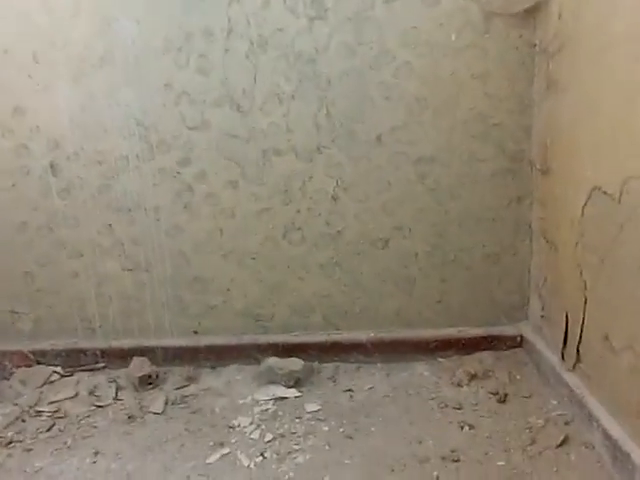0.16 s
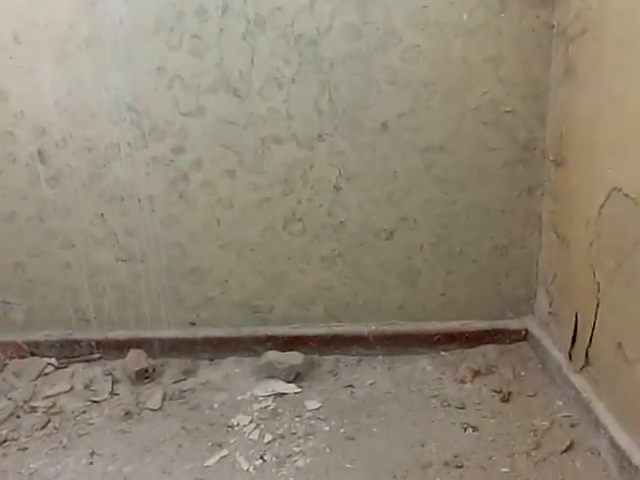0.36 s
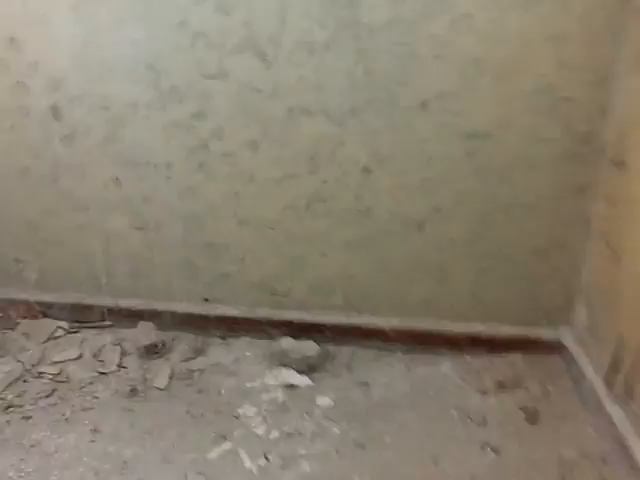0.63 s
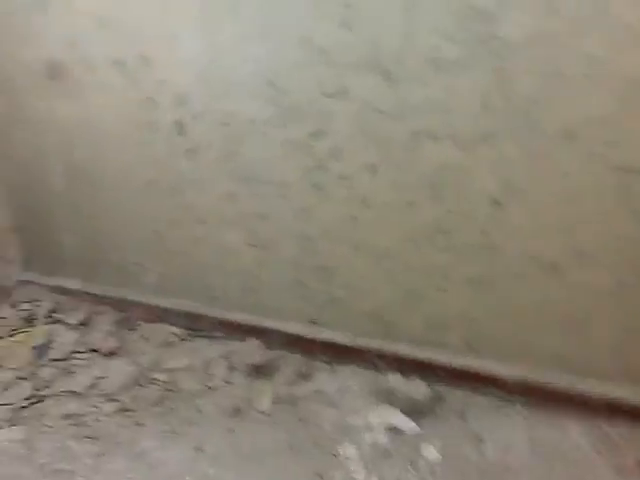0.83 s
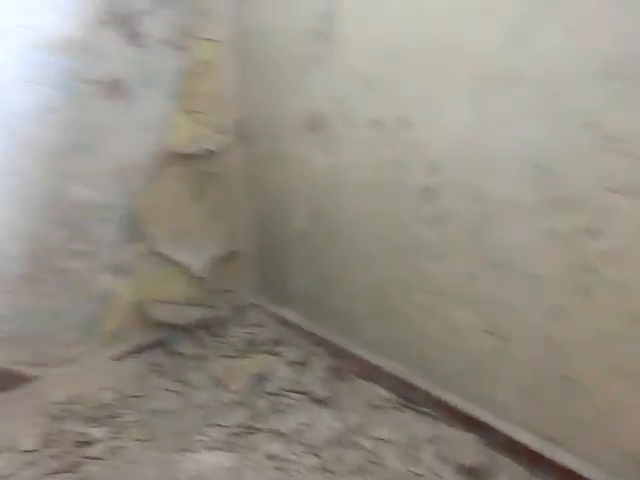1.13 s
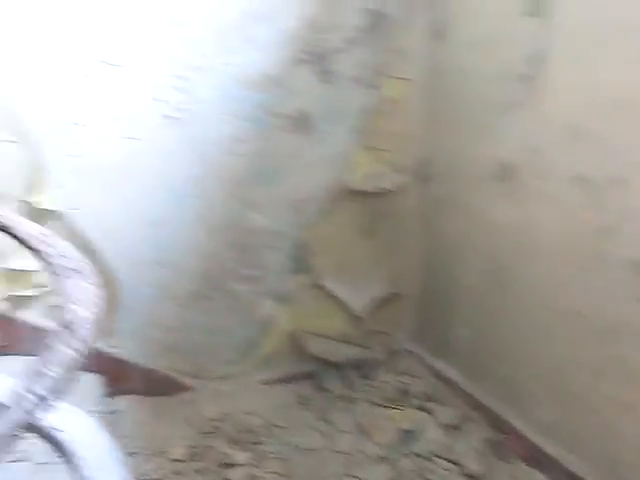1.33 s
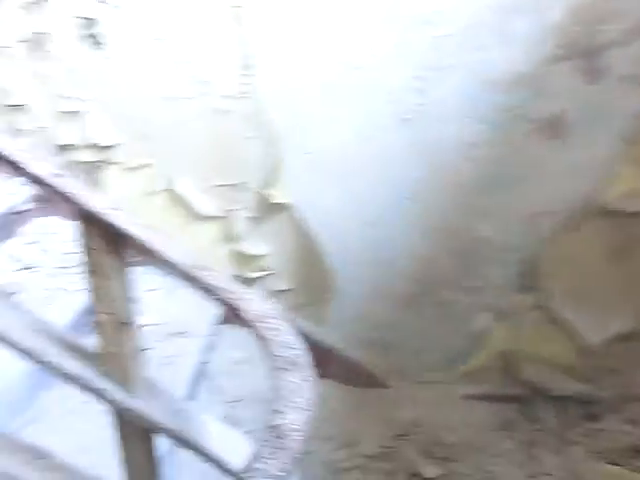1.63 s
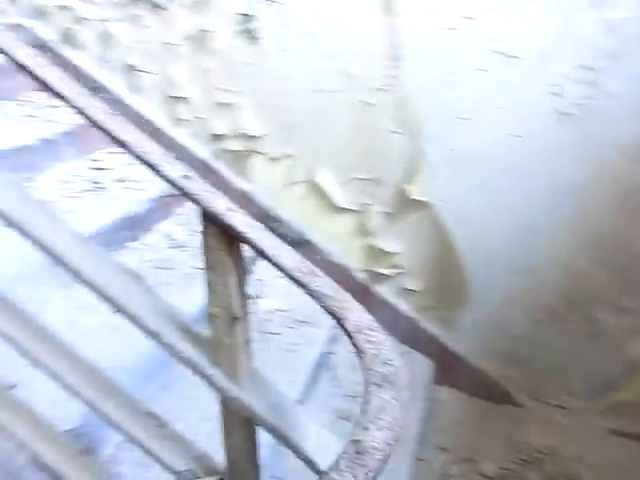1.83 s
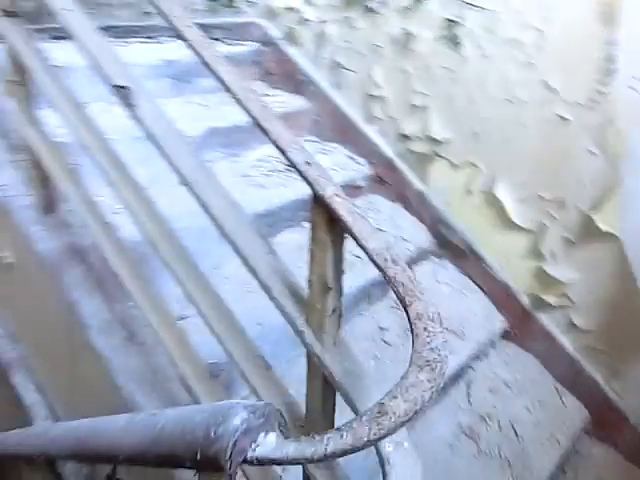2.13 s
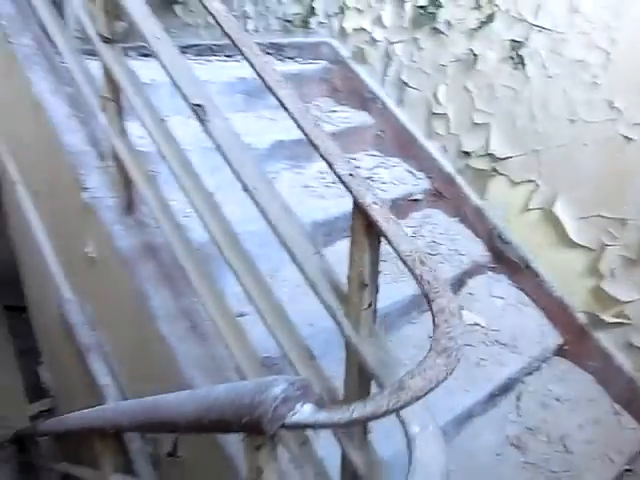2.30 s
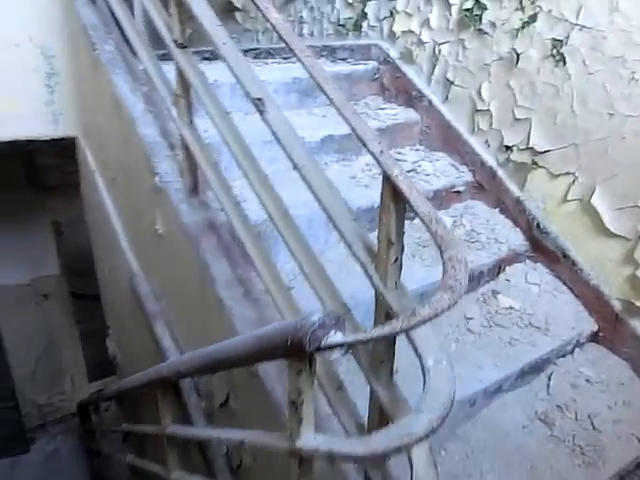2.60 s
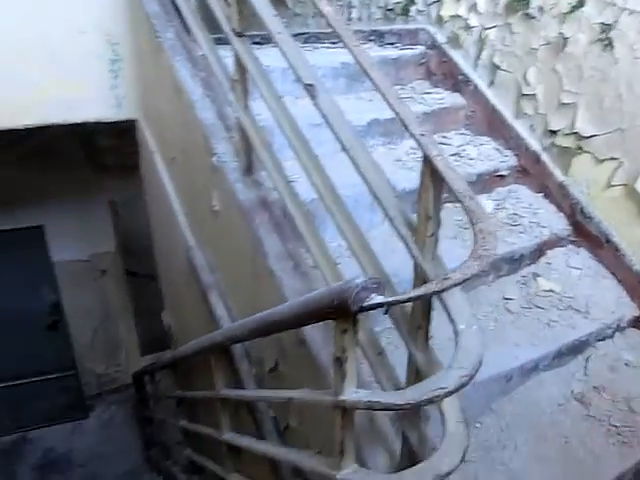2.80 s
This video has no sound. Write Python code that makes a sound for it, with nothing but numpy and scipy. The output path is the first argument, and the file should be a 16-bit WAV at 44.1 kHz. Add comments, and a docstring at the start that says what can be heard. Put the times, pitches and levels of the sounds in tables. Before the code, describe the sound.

Footsteps crunch slowly over plaster debris on a concrete landing in an empty, echoing stairwell

```python
"""Shoes take five steps over a concrete landing strewn with plaster in a bare stairwell, heard in stereo.
Heels knock and send weight into the slab as decaying tones; debris crushed and dragged underfoot is
dense random cracks, and dropping crumbs tick. Faint echoes of the steps come back from the stairwell.
A jacket sleeve, slightly to the right, swishes as coloured noise and whistles as gliding sines.
Behind it all lie building and microphone noise, a low wavering drone and deep rumble on the microphone."""
import sys
import numpy as np
from scipy import signal
from scipy.fft import rfft, irfft, next_fast_len
from scipy.io import wavfile
from scipy.ndimage import uniform_filter1d

SR = 44100
rng = np.random.default_rng(int(sys.argv[2]) if len(sys.argv) > 2 else 0)


def decibels_to_gain(level_db):
    """Convert a level in decibels to a linear amplitude gain (20 dB per decade)."""
    exponent = np.asarray(level_db, float) / 20
    return 10 ** exponent


def store_pcm(level_fs):
    """Save levels as 16-bit WAV."""
    pcm = np.round(np.clip(level_fs, -1, 1) * 32767).astype(np.int16)
    wavfile.write(sys.argv[1], SR, np.atleast_2d(pcm).T)


N = 130095

# lean of the footsteps between the two microphone channels: (frequency [Hz], left minus right [dB])
STEP_BALANCE = [(100, 2.7), (1000, 1.4), (4000, 2.2), (12000, -3)]


def footsteps():
    """All sounds of the feet with their echoes; the balance of the channels depends on frequency."""
    middle, side = crush()
    feet = middle + knocks() + ticks() + thuds()
    feet = feet + stairwell(feet) + side * [[1], [-1]]
    left = tint(feet[0], np.array(STEP_BALANCE) * [1, 0.5])
    right = tint(feet[1], np.array(STEP_BALANCE) * [1, -0.5])
    return np.array([left, right])


# plaster crushed under the sole, one list per footstep:
# (time [s], level of the cracks [dB], fine grit against it [dB], dull body against it [dB])
CRUSH_LOAD = [
    [(0.341, -27, -21, -15), (0.347, -31.5, -20, -32), (0.353, -33.5, -7, -4.5), (0.481, -63, 2, -8),
     (0.52, -70, -12, 7)],
    [(0.982, -42, -12, -20), (0.994, -43.5, -14, -15), (1.0, -52, -3.5, 7), (1.032, -50, -6.5, -7),
     (1.048, -56.5, 1.5, -12), (1.096, -66, -7, 12), (1.134, -57, 1, -14), (1.164, -54, 1.5, -1),
     (1.242, -66.5, -10, 5.5), (1.252, -76, -18, 23), (1.26, -67, -4, 9)],
    [(1.612, -44, -16, 4), (1.626, -28, -9.5, -15.5), (1.638, -30.5, -6, -12), (1.71, -46, -0.5, -16),
     (1.718, -38, -7.5, -14.5), (1.77, -51, -5.5, -5), (1.816, -38.5, -10.5, -20), (1.842, -48, -3.5, 0.5),
     (1.958, -59.5, -1.5, 1.5), (1.988, -65, 9, -20), (2.022, -54, -5.5, 9), (2.1, -68, -11, -9)],
    [(2.29, -47.5, -14, 3), (2.312, -30, -16, -4), (2.372, -45, -8, -0.5), (2.408, -39.5, -1.5, -14),
     (2.42, -33.5, 0.5, -43), (2.454, -27, -4.5, -23), (2.602, -61, 5, -5), (2.66, -79, -2, -1)],
    [(2.885, -38.5, -24, -24), (2.891, -56, -20, 7), (2.95, -51.5, -14, -9)],
]
# colour of the cracking pieces: (frequency [Hz], level [dB])
CHUNK_COLOUR = [(290, -34), (500, 7.5), (969, -9), (1030, -19.5), (1120, 5.5), (1970, 4.5), (4500, -11.5),
                (5850, -39), (9900, -120)]
# colour of the fine grit: (frequency [Hz], level [dB])
GRIT_COLOUR = [(2060, -34), (3500, -5), (4170, -5), (4750, 0.5), (10700, -13.5), (15500, -29)]
# colour of the grit heard off-centre: (frequency [Hz], level [dB])
SPREAD_COLOUR = [(4000, -8), (8000, -12.5), (12000, 5), (15500, -22)]


def crush():
    """Cracks, grit around the foot and dull sole body, all under the foot's load: (middle, side)."""
    low_cut_hz, grit_width_db = 187, -6.5
    body_colour = [(200, -20), (350, 11), (600, 6.5)]  # (frequency [Hz], level [dB])
    cracks = grains(2000, 1, 4.92, CHUNK_COLOUR, 725, 4940)
    grit = grains(8300, 2, 3.07, GRIT_COLOUR, 3920, 14400, count=10)
    spread = grains(8300, 2, 3.07, SPREAD_COLOUR, 3920, 14400, count=10)
    body = grains(560, 2, 5.9, body_colour, 222, 788, count=8)
    grit_level = level(CRUSH_LOAD, column=1)
    middle = level(CRUSH_LOAD) * cracks + grit_level * grit + level(CRUSH_LOAD, column=2) * body
    low_cut = signal.butter(4, low_cut_hz, "high", fs=SR, output="sos")
    return signal.sosfilt(low_cut, middle), decibels_to_gain(grit_width_db) * grit_level * spread


# shoe knocks and snapping pieces, a row per ringing piece:
# (time [s], peak level [dB], pitch [Hz], ring length [cycles])
KNOCK_ROWS = [(0.3387, -15.5, 1590, 3.2), (0.3378, -21.5, 605, 4.5), (0.351, -20, 2880, 6.7),
              (.977, -37, 950, 12), (.978, -39.5, 300, 4), (0.989, -43, 494, 7.7), (1.6195, -31.5, 556, 18),
              (1.625, -24.5, 1920, 14.4), (1.63, -24.5, 1370, 8), (1.65, -32.5, 578, 8.5),
              (1.72, -27, 1680, 4.6), (1.813, -35, 1680, 5.7), (2.293, -33, 348.5, 16),
              (2.31, -24, 990, 11), (2.315, -27.5, 732, 9.1), (2.443, -20, 2650, 14),
              (2.451, -37, 1700, 2.2), (2.465, -19, 2330, 7.1), (2.48, -28, 1480, 3.5),
              (2.797, -39, 1460, 2.6), (2.879, -31, 763, 10.4)]


def knocks():
    """Shoe knocks and snaps, each a short sine that swells and dies."""
    out = np.zeros(N + SR)
    for time_s, peak_db, hz, cycles in KNOCK_ROWS:
        add_contact(out, time_s, peak_db, hz, cycles)
    return out[:N]


# heel weight into the slab: (time [s], level before the mode levels [dB])
HEEL_THUDS = [(.337, -46), (.975, -34), (1.618, -46.5), (2.296, -52), (2.881, -48.5)]
# ringing modes of the slab: (frequency [Hz], level [dB], 60 dB decay time [s])
SLAB_MODES = [(83.4, -16.5, .6), (131, -24, 0.12), (147.7, -5, 0.098), (210.3, -10, 0.31)]


def thuds():
    """Heel weight strikes the slab, whose low modes ring with slightly uneven strength."""
    heel = np.zeros(N)
    for time_s, heel_db in HEEL_THUDS:
        for hz, mode_db, t60 in SLAB_MODES:
            strike_db = heel_db + mode_db + rng.normal(0, 0.82)
            heel += ring(click(time_s, strike_db), hz, t60)
    return signal.sosfilt(signal.butter(2, [60, 300], "band", fs=SR, output="sos"), heel)


# crumbs dropping: (time [s], peak level [dB], pitch [Hz])
CRUMB_TICKS = [(.535, -36, 4960), (.5365, -41, 8400), (.554, -34, 6540), (.556, -37, 9500),
               (.579, -48, 3030), (1.149, -20, 6700), (1.158, -46.5, 10100), (1.2675, -46, 9500),
               (1.287, -39, 4850), (1.298, -45, 13900), (2.76, -51.5, 3530)]


def ticks():
    """Dropping crumbs tick, each a tiny high sine that swells and dies."""
    out = np.zeros(N + SR)
    for time_s, peak_db, hz in CRUMB_TICKS:
        add_contact(out, time_s, peak_db, hz, cycles=4.9)
    return out[:N]


def stairwell(x):
    """Feedback delays, duller every round; a main set and a weaker set that differs between the ears."""
    t60_s, wall_cut_hz, room_db, side_db = 0.63, 5150, -19, -27.5  # side_db is against the main set
    size = next_fast_len(N + 2 * SR)
    bins = size // 2 + 1
    turn = np.exp(-2j * np.pi * np.arange(bins) / size)  # delay by one sample
    dull = np.exp(-2 * np.pi * wall_cut_hz / SR)
    wall = (1 - dull) / (1 - dull * turn)
    out = np.zeros((2, bins), complex)
    lags = (rng.uniform(0.014, 0.038, 20) * SR).astype(int)
    for k, lag in enumerate(lags):
        loop = decibels_to_gain(-60 * lag / SR / t60_s) * wall * turn ** lag
        out[k % 2] += loop / (1 - loop) * (-1) ** (k // 2)
    # short recirculating delays smear the echoes
    for lag in (67, 151, 239):
        out *= (turn ** lag - 0.6) / (1 - 0.44 * turn ** lag)
    mid, side = irfft(out * rfft(x, size), size)[:, :N]
    return decibels_to_gain(room_db) * (mid + decibels_to_gain(side_db) * side * [[1], [-1]])


# sleeve rubbing on the jacket, one list per swing: (time [s], hiss level before panning [dB])
SLEEVE_SWISH = [
    [(1.76, -62), (1.8, -52), (1.86, -57.5), (1.93, -53), (2.0, -59), (2.05, -59), (2.11, -79)],
    [(2.44, -48), (2.52, -43.5), (2.62, -47.5), (2.73, -50.5), (2.79, -54.5), (2.95, -65)],
]
# colour of the cloth hiss: (frequency [Hz], level [dB])
CLOTH_COLOUR = [(3000, -26), (5800, -17), (6800, 0), (7600, -10), (8600, 3), (9400, -2), (10400, 4.5),
                (11500, -5), (13000, -8), (15500, -27)]
# whistles of the weave, gliding up and down in pitch:
# (time [s], pitch before thread ratio [Hz], level before thread level, flicker and panning [dB])
WEAVE_WHISTLES = [
    [(1.79, 8260, -79), (1.8, 8330, -48), (1.83, 9200, -49.5), (1.857, 8840, -40), (1.89, 8900, -49),
     (1.92, 8200, -47.5), (1.927, 8300, -72)],
    [(1.93, 8050, -68), (1.95, 8400, -64), (1.968, 9200, -51), (1.978, 9040, -50.5), (2.0, 9050, -58),
     (2.02, 8200, -51), (2.03, 7950, -61)],
]
# neighbouring threads: (pitch ratio [1], level [dB])
WEAVE_THREADS = [(1, 4.5), (.94, -7), (0.35, -25), (0.69, -21)]
# fainter lone whistles:
# (time [s], pitch before the ratio in sleeve() [Hz], level before flicker and panning [dB])
LONE_WHISTLES = [
    [(1.87, 14200, -63), (1.9, 13500, -66), (1.925, 13300, -63), (1.95, 13500, -66), (1.975, 14100, -65),
     (2.005, 12600, -68)],
    [(1.915, 10000, -69), (1.955, 10300, -63), (2.005, 9900, -64)],
    [(1.917, 7300, -62), (1.94, 7460, -63)],
    [(2.055, 10100, -71), (2.09, 9050, -61)],
]


def sleeve():
    """Hiss of the cloth plus gliding whistles of the weave, slightly to the right."""
    wobble, flicker_db, pan_db = 0.0041, 3.5, -2  # wobble is a fraction of pitch; pan is left minus right
    t = np.arange(N) / SR
    # noise partly shared by both channels
    noise = rng.standard_normal((2, N)) + 1.35 * rng.standard_normal(N)
    out = level(SLEEVE_SWISH) * rms_one(tint(noise, CLOTH_COLOUR))
    whistles = [(rows, WEAVE_THREADS) for rows in WEAVE_WHISTLES]
    whistles += [(rows, [(0.97, 0)]) for rows in LONE_WHISTLES]
    for rows, threads in whistles:
        s, hz, db = np.transpose(rows)
        pitch = uniform_filter1d(np.interp(t, s, hz), size=500)
        loudness = level([np.c_[s, db]]) * np.sqrt(2)
        for ratio, thread_db in threads:
            thread_hz = pitch * ratio * (1 + wobble * drift(147))
            phase = np.cumsum(thread_hz) * 2 * np.pi / SR
            # the right channel is shifted in phase by chance
            wave = np.sin(phase + rng.uniform(0, np.pi) * np.array([[0], [1]]))
            out = out + loudness * decibels_to_gain(thread_db + flicker_db * drift(70)) * wave
    return out * decibels_to_gain([[pan_db / 2], [-pan_db / 2]])


# colour of the building and microphone noise: (frequency [Hz], level [dB])
AIR_COLOUR = [(15, -42), (25, -20), (91, -16.5), (156, -9), (390, -2), (1240, -8), (1910, -8), (3850, -15),
              (4770, -13.5), (8400, -20), (15600, -23)]
# likeness of the two channels, negative values count as 0: (frequency [Hz], likeness [1])
AIR_LIKENESS = [(60, -0.83), (180, 0.88), (550, 0.93), (1650, 0.92), (4970, 0.65), (15000, -0.05)]
# level of the steady noise, with faint breath-like rises, strongest at the start:
# (time [s], level up or down [dB])
AIR_LEVEL = [(0, 12), (.25, 3.5), (.6, 5.5), (.95, 4), (1.25, 2), (1.5, 1.5), (2.0, 6), (2.25, -2.5),
             (2.6, 3), (2.95, 3)]


def air():
    """Steady noise with faint rises, alike in both ears except in deepest bass and highest treble."""
    hz, alike = np.transpose(AIR_LIKENESS)
    alike = np.clip(alike, 0, 0.99)
    mid, side = tint(rng.standard_normal((2, N)), AIR_COLOUR)
    side = tint(side, np.c_[hz, 10 * np.log10((1 - alike) / (1 + alike))])
    gain = decibels_to_gain(-57 + 1.4 * drift(3.1)) * level([AIR_LEVEL])  # dB before the table, wandering slowly
    return gain * rms_one(mid + side * [[1], [-1]])


# low drone wavering in the stairwell: (time [s], level [dB])
DRONE_LEVEL = [(0, -70), (.6, -69.5), (1.3, -73), (1.6, -72), (2.0, -65.5), (2.1, -64), (2.25, -65),
               (2.6, -69.5), (2.95, -71.5)]


def drone():
    """Noise through one narrow resonance, so its tone wavers; the same in both channels."""
    return level([DRONE_LEVEL]) * rms_one(ring(rng.standard_normal(N), hz=139.7, t60=0.27))


# deep rumble on the microphone: (time [s], level [dB])
RUMBLE_LEVEL = [(0.0, -67.5), (0.42, -72), (0.6, -79), (0.94, -71), (0.99, -71), (1.33, -66), (2.28, -91),
                (2.3, -71), (2.95, -75)]


def rumble():
    """Low band of noise, partly different in the two channels."""
    band = signal.butter(2, [30, 70.6], "band", fs=SR, output="sos")
    mid, side = signal.sosfilt(band, rng.standard_normal((2, N)))
    return level([RUMBLE_LEVEL]) * rms_one(mid + 0.43 * side * [[1], [-1]])


def rms_one(x):
    """Scales a sound to rms 1."""
    return x / np.sqrt(np.mean(x ** 2) + 1e-20)


def at_hz(points, hz):
    """Reads a (frequency [Hz], level [dB]) table along log frequency."""
    table = np.array(points)
    return np.interp(np.log(hz), np.log(table[:, 0]), table[:, 1])


def level(tables, column=0):
    """Gain in time from tables of (time [s], level [dB], offsets [dB]); silent outside each table."""
    out, t = np.zeros(N), np.arange(N) / SR
    for rows in tables:
        rows = np.array(rows, float)
        db = rows[:, 1] + (rows[:, 1 + column] if column else 0)
        # rises in 3 ms and fades in 30 ms at the ends
        s = np.r_[rows[0, 0] - 0.003, rows[:, 0], rows[-1, 0] + 0.03]
        out += decibels_to_gain(np.interp(t, s, np.r_[-120, db, -120]))
    return out


def drift(rate_hz):
    """Slow chance of rms 1: noise smoothed by two equal low-pass poles."""
    r = np.exp(-2 * np.pi * rate_hz / SR)
    noise = rng.standard_normal(N + SR)
    return rms_one(signal.lfilter([1], [1, -2 * r, r * r], noise)[SR:])


def ring(clicks, hz, t60):
    """A two-pole resonance: a unit click starts a decaying sine of height about 1."""
    r, w = decibels_to_gain(-60 / (t60 * SR)), 2 * np.pi * hz / SR
    return signal.lfilter([0, np.sin(w)], [1, -2 * r * np.cos(w), r * r], clicks + 1e-18)


def click(s, db):
    """A single-sample impulse."""
    out = np.zeros(N)
    out[int(s * SR)] = decibels_to_gain(db)
    return out


def grains(per_s, spread_db, cycles, colour, low_hz, high_hz, count=16):
    """Random cracks of uneven size that swell and ring at one of several pitches; rms 1."""
    sizes = decibels_to_gain(spread_db * np.minimum(rng.exponential(1, N), 5)) * rng.choice([-1, 1], N)
    sizes = sizes * (rng.random(N) < per_s / SR)
    dealt = rng.integers(0, count, N)
    out = np.zeros(N)
    for k, hz in enumerate(np.geomspace(low_hz, high_hz, count)):
        # two resonances in a row give each crack its swell
        cracks = ring(ring(sizes * (dealt == k), hz, cycles / hz), hz, cycles / hz)
        out += np.sqrt(hz) * decibels_to_gain(at_hz(colour, hz)) * rms_one(cracks)
    return rms_one(out)


def tint(x, points):
    """Colours a sound by a spectrum."""
    size = next_fast_len(N)
    hz = np.arange(size // 2 + 1) * SR / size + 1  # 1 Hz up, to avoid log 0
    return irfft(rfft(x, size) * decibels_to_gain(at_hz(points, hz)), size)[..., :N]


def add_contact(out, s, db, hz, cycles):
    """Adds a soft contact at time s: a sine that swells, then dies away over some cycles."""
    cycles_long = max(cycles, 1)
    phase = np.arange(int(SR * 2 * cycles_long / hz)) * hz / SR  # in cycles
    shape = phase * decibels_to_gain(-60 * phase / cycles_long) * np.sin(2 * np.pi * phase)
    start = int(s * SR)
    out[start:start + len(shape)] -= decibels_to_gain(db) * shape / np.abs(shape).max()


def scene():
    """The steps in front, then the sleeve, with the stairwell's background behind."""
    return footsteps() + sleeve() + air() + drone() + rumble()


def roll_off(x):
    """The treble ends steeply here."""
    return signal.sosfilt(signal.butter(12, 15750, fs=SR, output="sos"), x)


def record(dry):
    """Passes on the finished stereo mix."""
    return roll_off(dry)


dry = scene()
out = record(dry)
store_pcm(out)
```